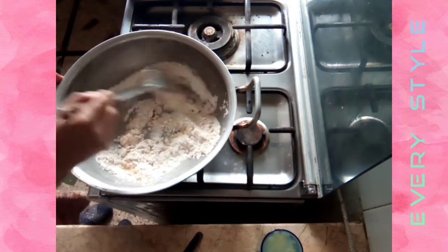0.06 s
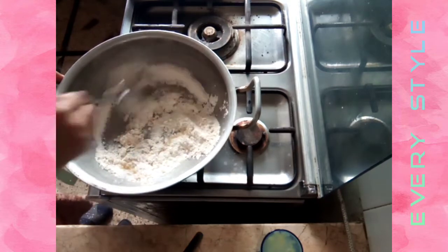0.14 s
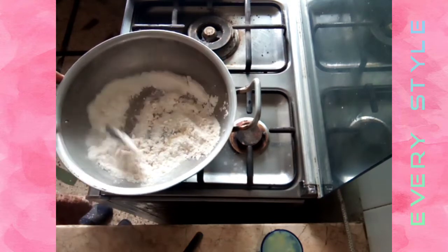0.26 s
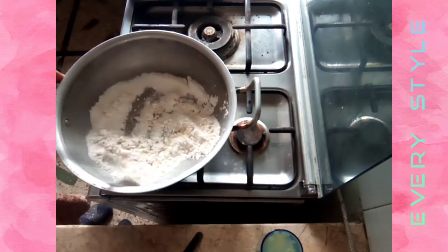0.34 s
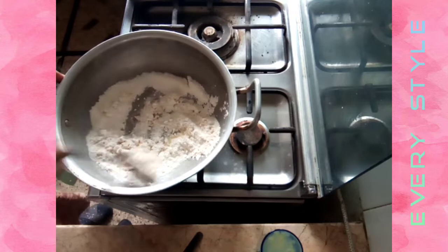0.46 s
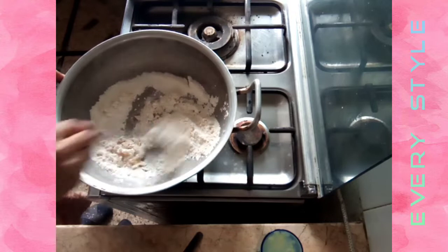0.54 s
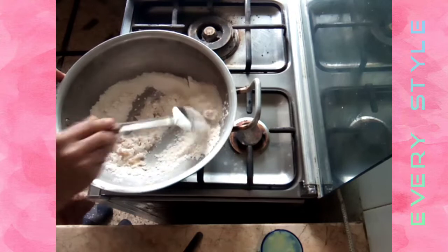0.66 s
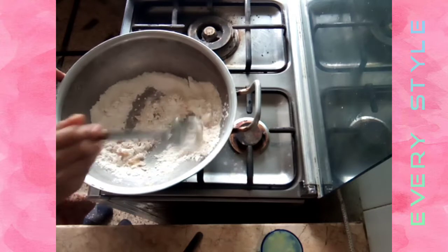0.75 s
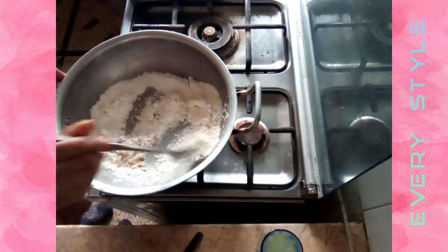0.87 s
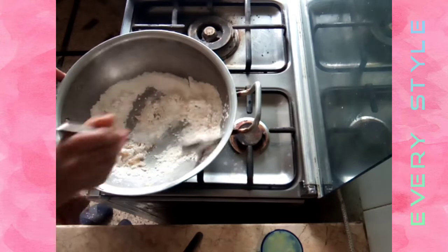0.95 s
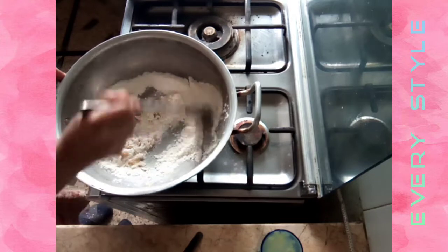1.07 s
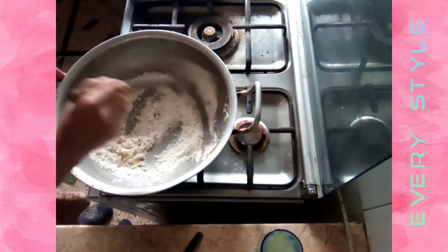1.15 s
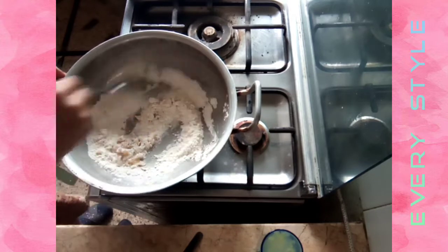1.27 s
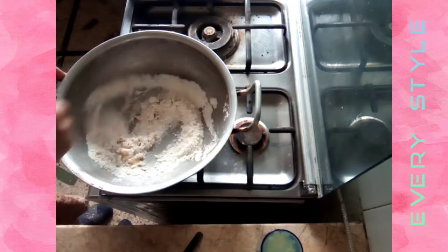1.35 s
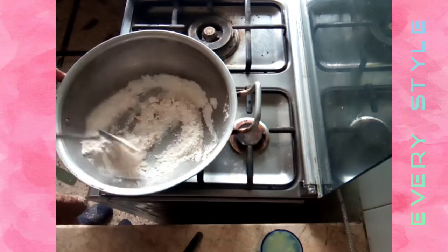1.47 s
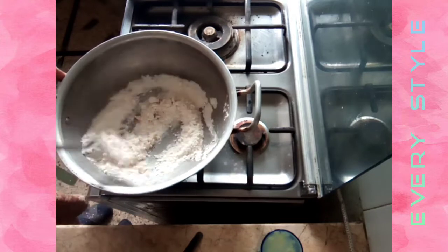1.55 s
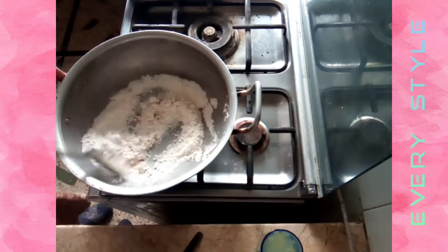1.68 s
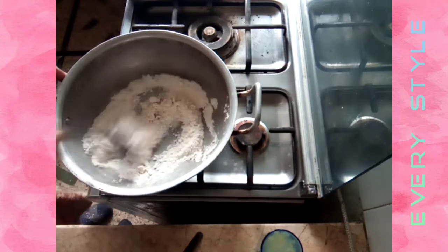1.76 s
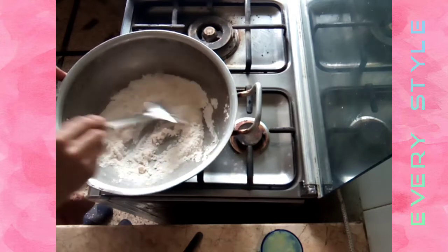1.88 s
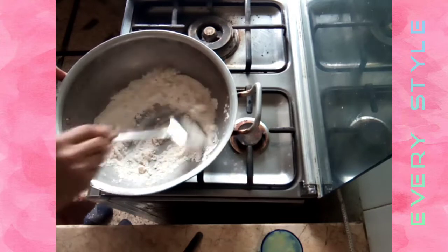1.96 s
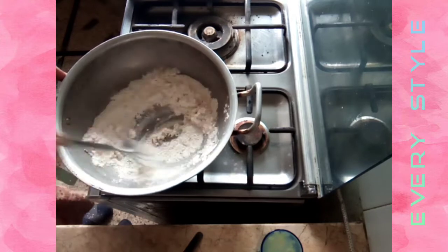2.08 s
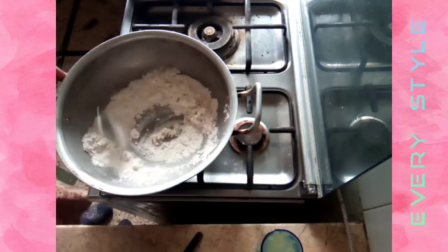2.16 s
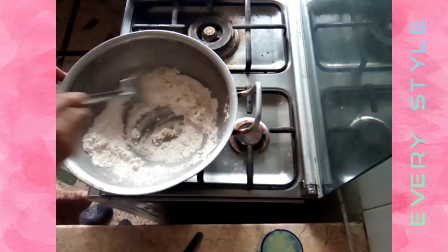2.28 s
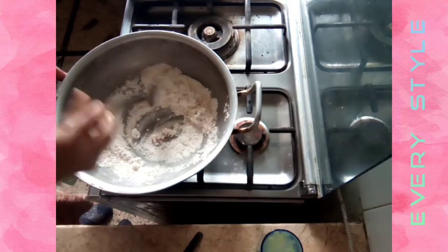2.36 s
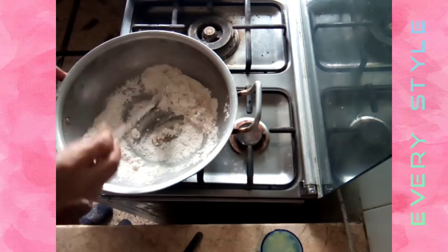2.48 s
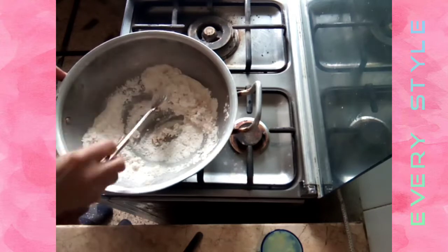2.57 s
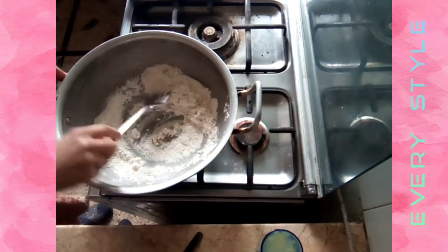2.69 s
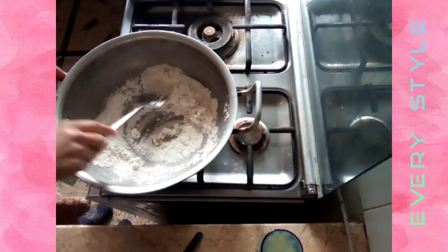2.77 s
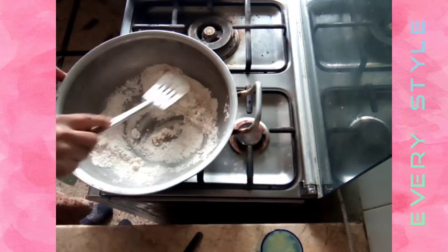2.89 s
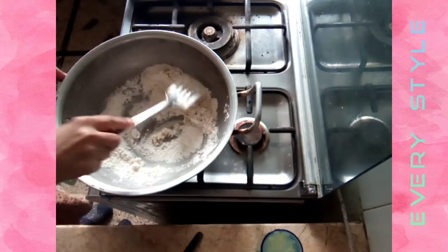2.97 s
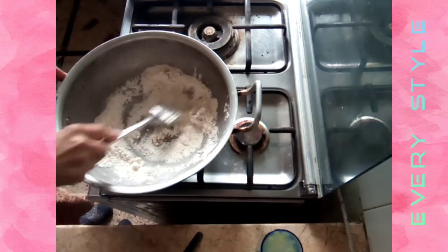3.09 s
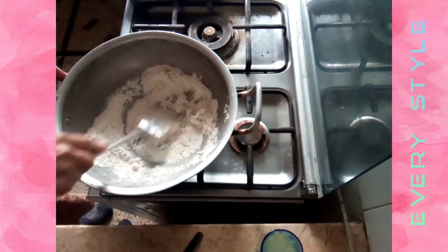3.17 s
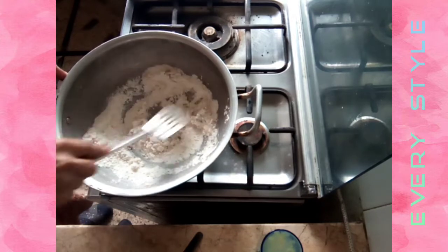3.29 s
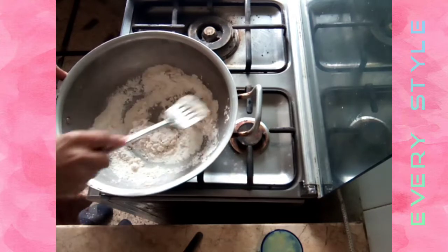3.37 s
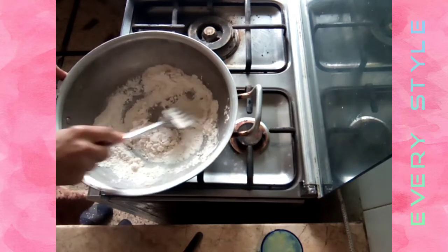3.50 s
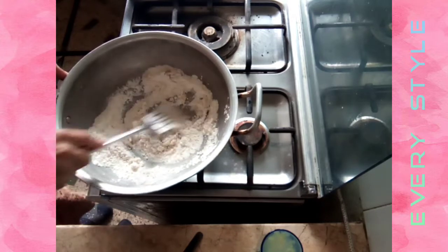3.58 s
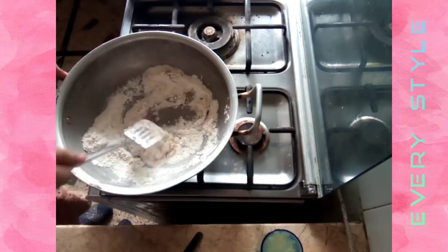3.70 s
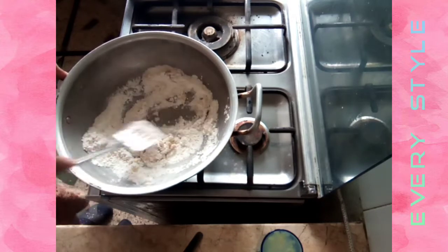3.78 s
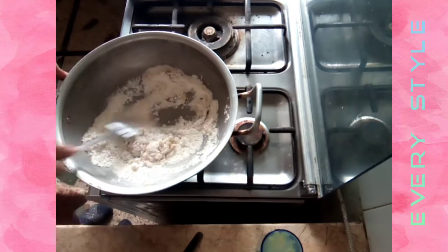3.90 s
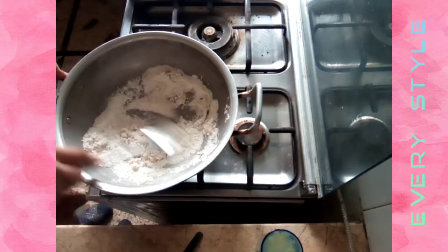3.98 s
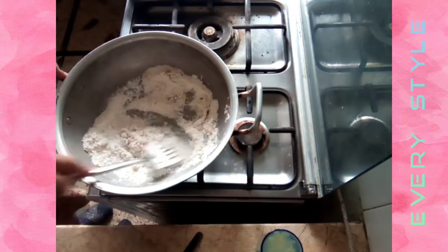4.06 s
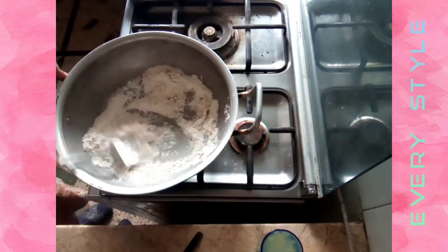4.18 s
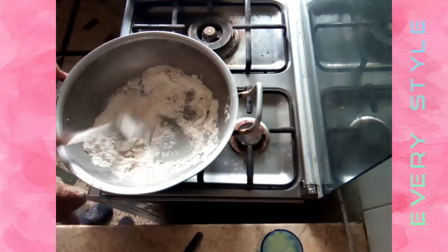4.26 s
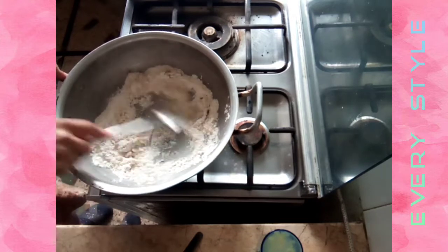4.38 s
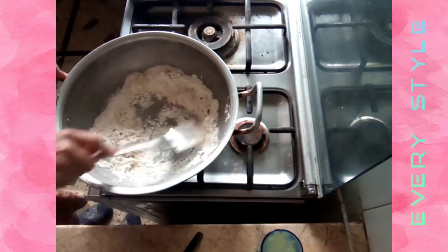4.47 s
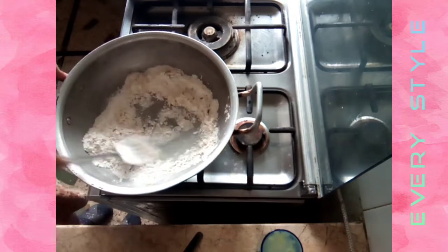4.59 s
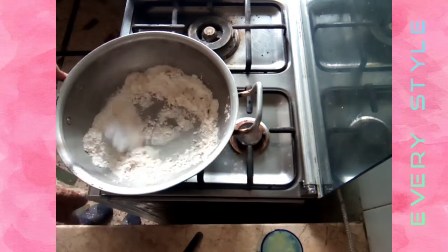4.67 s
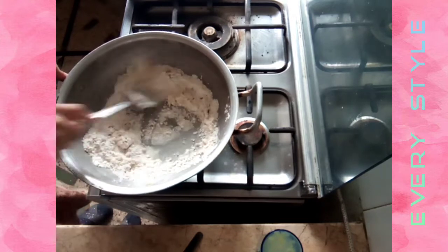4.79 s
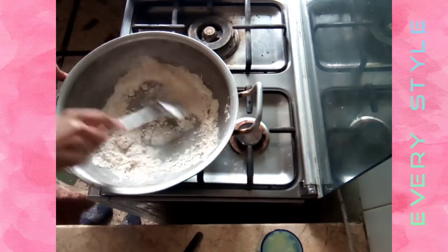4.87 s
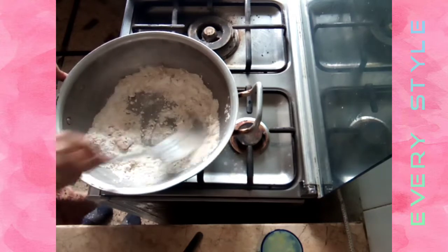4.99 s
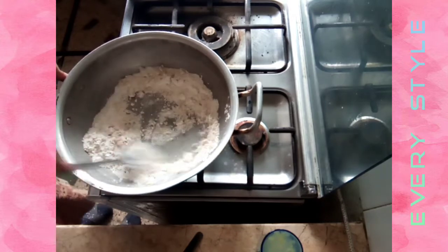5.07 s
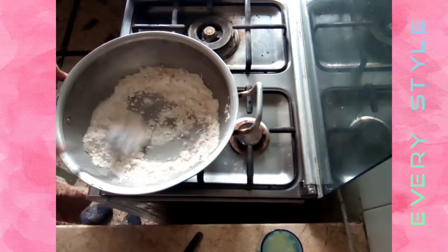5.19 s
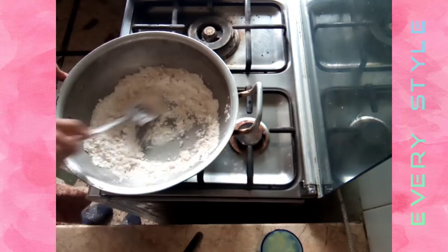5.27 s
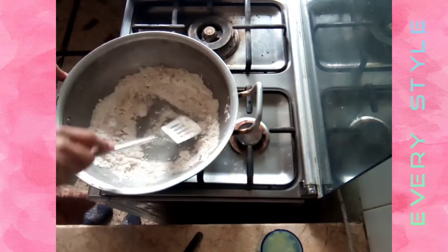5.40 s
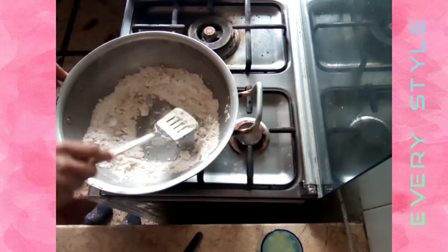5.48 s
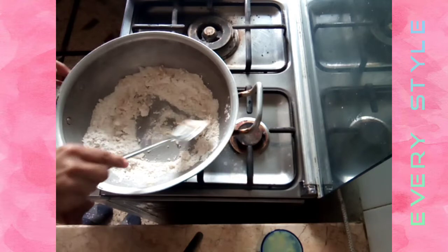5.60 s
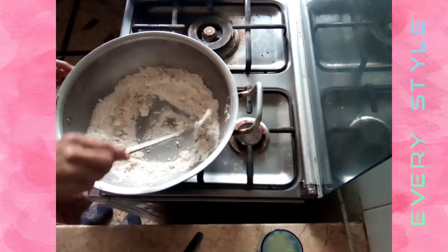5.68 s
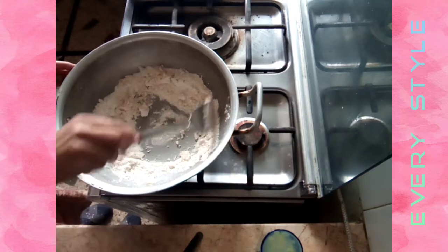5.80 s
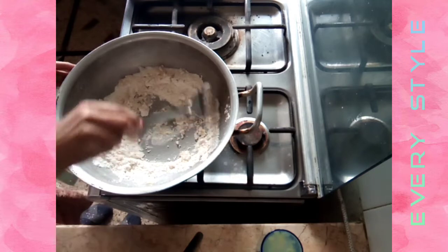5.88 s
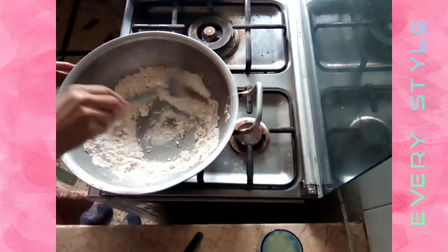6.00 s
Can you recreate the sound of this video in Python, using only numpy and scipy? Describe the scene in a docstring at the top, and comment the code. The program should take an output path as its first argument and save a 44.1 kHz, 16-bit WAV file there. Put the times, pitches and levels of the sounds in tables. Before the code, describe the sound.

A metal spatula scrapes dry flour around a metal pan in repeated rasping strokes, with occasional light taps and dull thuds.

```python
"""A small hard kitchen: a slotted steel spatula stirs dry flour in a wide metal pan on a stove,
heard by a phone just above. Friction of the blade's edge over grit and bare metal is a broadband
force that drives the normal modes of pan and blade. Now and then the blade taps the pan, and heaped
flour thuds dully through pan floor and stove top. The metal sounds reverberate over a faint hiss."""
import sys
import numpy as np
from scipy import signal
from scipy.fft import rfft, irfft, next_fast_len
from scipy.io import wavfile
from scipy.ndimage import uniform_filter1d

SR = 44100
rng = np.random.default_rng(int(sys.argv[2]) if len(sys.argv) > 2 else 0)


def master_out(mix):
    """Clip the mix to full scale and print it as 16-bit PCM to the path in sys.argv[1]."""
    frames = np.transpose(np.atleast_2d(mix))
    ceiling = np.clip(frames, -1, 1)
    pcm = np.round(ceiling * 32767).astype(np.int16)
    wavfile.write(sys.argv[1], SR, pcm)


N = 266628


def undb(db):
    """Amplitude ratio of a level in decibels."""
    return 10 ** (np.asarray(db) / 20)


def level(x, db=0):
    """Normalisation to an rms level."""
    return x * undb(db) / np.sqrt(np.mean(x ** 2))


def colour(x, spectrum):
    """Spectral shaping by (f/Hz, level/dB) points, joined on a logarithmic frequency axis."""
    hz, db = np.transpose(spectrum)
    size = next_fast_len(len(x))
    log_hz = np.log(np.maximum(np.fft.rfftfreq(size, 1 / SR), 1))
    return irfft(rfft(x, size) * undb(np.interp(log_hz, np.log(hz), db)), size)[:len(x)]


def resonate(x, hz, *widths_hz):
    """Resonance with unit gain at its centre; each further bandwidth in cascade steepens the skirts."""
    for width in widths_hz:
        x = signal.lfilter(*signal.iirpeak(hz, hz / width, fs=SR), x)
    return x


def wander(rate_hz):
    """Random modulation: held values, smoothed twice, with a spread near 1."""
    hold = int(SR / rate_hz)
    steps = np.repeat(rng.standard_normal(N // hold + 1), hold)
    return 1.37 * uniform_filter1d(uniform_filter1d(steps, hold), hold)[:N]


def per_sample(rows):
    """Linear interpolation of envelopes from millisecond steps to samples."""
    return np.array([np.interp(np.arange(N) / SR, np.arange(len(row)) / 1000, row) for row in rows])


# Spectrum of the background: f/Hz, relative spectral level/dB
HISS_SPECTRUM = [(35, -51.5), (60, -33), (107, -3), (243, -31), (336, -25), (661, -30), (1030, -36),
                 (1130, -34), (1300, -23.5), (1560, -36.5), (3970, -34), (7990, -34.5), (9300, -26.5),
                 (11500, -30), (13000, -41), (15700, -29.5)]

def hiss():
    """Stationary coloured noise: a faint hiss with a low hump."""
    return level(colour(rng.standard_normal(N), HISS_SPECTRUM), db=-73)


def kitchen(x, t60_s=0.28, onset_s=0.0081, gain_db=-8.5):
    """Reverberation: dense reflections from tiles and steel build up, then decay exponentially."""
    t = np.arange(int(0.6 * SR)) / SR
    dull, bright = rng.standard_normal((2, len(t)))
    dull = signal.lfilter(*signal.butter(1, 5000, fs=SR), dull) * np.exp(-np.log(1000) * t / t60_s)
    bright = bright * np.exp(-np.log(1000) * t / (1.1 * t60_s))
    tail = (dull + 0.47 * bright) * np.minimum(t / onset_s, 1)
    return undb(gain_db) * signal.fftconvolve(x, tail / np.sqrt(np.sum(tail ** 2)))[:N]


# A pan that never lies quite still: level/dB of rumble, boom and drum
SETTLED_DB = [-91.5, -92, -99]
# Flour shoved, pan rocking on the grate: t/s, duration/s, rumble level/dB, boom and drum re rumble/dB
FLOUR_SHOVES = [(0.0, .04, -52, -10.5, -1.5), (0.11, 0.069, -69.5, -9, 13), (0.24, 0.025, -51, -20, -3.5),
                (0.36, 0.041, -59, -11, -7), (0.457, 0.045, -57, -14, 3.5), (0.604, 0.053, -58.5, -7, 6.5),
                (0.796, 0.14, -67, -4, 1), (1.004, 0.073, -60.5, -1, 2), (1.146, 0.054, -67, -2, 5),
                (1.233, 0.12, -65, -22, 5), (1.454, 0.08, -65, -10, 2), (1.58, 0.066, -68, -10, -1.5),
                (1.694, 0.09, -70, 2, 2.5), (1.794, .04, -60, -6, 3), (1.85, .08, -54.5, -13, 2),
                (2.02, 0.14, -66, -13, 1), (2.263, 0.083, -61, -20, 6.5), (2.516, 0.057, -72, -19, -10),
                (2.837, 0.065, -71, -22, -15), (3.073, 0.078, -69, -3.5, 1),
                (3.192, 0.061, -61.5, -1.5, 1.5), (3.696, 0.084, -56.5, -9, -0.5),
                (3.89, 0.027, -67, -1, -7.5), (4.015, 0.084, -78, 3, -5.5), (4.458, .04, -82.5, 0, 7),
                (4.594, 0.031, -87.5, -5, 15.5), (4.803, .04, -82, 2, 7), (4.916, 0.055, -59, -11.5, -2.5),
                (5.42, 0.018, -81.5, -8, 6.5), (5.903, 0.15, -65.5, -19.5, 1.5)]

def shove_gains(rise_db_per_s=299.5, fall_db_per_s=(81.5, 79, 99)):
    """Exponential growth and decay of rumble, boom and drum; overlapping shoves add in power."""
    t = np.arange(0, N / SR + 0.002, 0.001)
    power = undb(np.c_[SETTLED_DB]) ** 2
    for start, duration, db, boom_db, drum_db in FLOUR_SHOVES:
        rise = rise_db_per_s * np.maximum(start - t, 0)
        fall = np.outer(fall_db_per_s, np.maximum(t - start - duration, 0))
        power = power + undb(np.c_[[db, db + boom_db, db + drum_db]] - rise - fall) ** 2
    return undb(per_sample(10 * np.log10(power)))


# Spectrum of shifting flour: f/Hz, relative level/dB
FLOUR_SPECTRUM = [(60, -35), (100, -5), (160, 5), (220, 0), (300, -31.5), (900, -57)]

def flour_heaps(floor_hz=299.7, floor_width_hz=97, stove_hz=65.1, stove_width_hz=17):
    """Forced vibration: rumbling heaps drum the pan floor's lowest mode and boom in the stove top."""
    rumble_gain, boom_gain, drum_gain = shove_gains()
    lumps = undb(2 * wander(30)) * rng.standard_normal(N)
    rumble = colour(lumps, FLOUR_SPECTRUM)
    drum = resonate(lumps, floor_hz, floor_width_hz, 2 * floor_width_hz)
    boom = resonate(rng.standard_normal(N), stove_hz, stove_width_hz, 2 * stove_width_hz)
    return rumble_gain * level(rumble) + drum_gain * level(drum) + boom_gain * level(boom)


# Normal modes of the pan, damped by flour: f/Hz, bandwidth/Hz, relative level/dB
PAN_MODES = [(554, 120, -4), (845, 55, -10), (1520, 100, -10), (2150, 42, -2), (2340, 52, -3),
             (3130, 190, -3), (3440, 99, -3), (4450, 59, -5), (5050, 300, -2), (5360, 34, -4),
             (5920, 180, -2), (6690, 66, 0), (7790, 75, -8), (8720, 85, -3), (9640, 180, -3),
             (10700, 190, -7), (11400, 100, -13), (11800, 62, -12), (12300, 48, -16), (12900, 150, -14),
             (13200, 93, -17), (14200, 69, -11)]

def pan_response(force):
    """Modal superposition: the struck pan answers with the sum of its resonances."""
    return sum(undb(db) * resonate(force, hz, width) for hz, width, db in PAN_MODES)


# Blade on pan: t/s, relative level/dB, clack f/Hz, wall knock weight/dB, contact decay time/s
BLADE_TAPS = [(0.4335, -53.5, 2150, 2, 0.005), (0.4662, -47, 4500, -3.5, 0.0045),
              (0.606, -35, 2130, -20, 0.00094), (0.622, -29, 2250, -29, 0.0029),
              (0.915, -62.5, 2150, 5, 0.0053), (1.0183, -46, 2440, -12, 0.0051),
              (1.5302, -56.5, 2500, 4.5, 0.0037), (1.6688, -53, 2700, -23, 0.0026),
              (1.788, -38.5, 4280, -10, 0.0039), (2.7688, -52.5, 4210, -9.5, 0.0082),
              (3.1953, -42, 2880, -3, 0.0023), (3.67, -35.5, 2970, -25, 0.002),
              (3.8372, -47, 2640, -16, 0.0038), (4.0118, -44, 2400, -40, 0.0018),
              (4.013, -43, 5400, -30, 0.0027), (4.0395, -55, 3000, -20, 0.0025),
              (4.114, -46, 5200, -27, 0.003), (4.3552, -43.5, 2860, -36, 0.0019)]

def blade_taps(wall_hz=1300, ping_decay_s=0.004):
    """Impact excitation: a brief rough contact makes the blade clack, the wall knock and the pan ring."""
    t = np.arange(int(0.046 * SR)) / SR
    force, clacks = np.zeros((2, N + len(t)))
    for start, db, hz, wall_db, contact_s in BLADE_TAPS:
        span = slice(int(start * SR), int(start * SR) + len(t))
        contact = undb(db) * rng.standard_normal(len(t)) * np.exp(-t / contact_s)
        clack = resonate(contact, hz, 700, 1500)
        ping = undb(db - 9.5) * np.sin(2 * np.pi * hz * t) * np.exp(-t / ping_decay_s)
        knock = undb(wall_db + 5) * resonate(contact, wall_hz, 930, 2000)
        force[span] += contact
        clacks[span] += clack + ping + knock
    soft_force = signal.sosfilt(signal.butter(4, [900, 4200], "band", fs=SR, output="sos"), force[:N])
    return undb(11) * clacks[:N] + undb(-1.5) * soft_force + undb(-6) * pan_response(soft_force)


# Spectral regions of a stroke (bowl, wall, rim, low ring, high ring, rasp, edge): f/Hz
REGION_HZ = [530, 950, 1500, 2200, 3300, 5700, 11000]

def drive_db(envelopes, hz):
    """Interpolation in log frequency: the stroke level between the two nearest regions."""
    place = np.interp(np.log(hz), np.log(REGION_HZ), np.arange(len(REGION_HZ)))
    below = min(int(place), len(REGION_HZ) - 2)
    share = place - below
    return (1 - share) * envelopes[below] + share * envelopes[below + 1]


# Fade of each region once the blade lifts: rate/(dB/s)
LIFT_DB_PER_S = [156, 166.5, 165, 169, 167, 178.4, 200]
# Pushes of the blade: t/s, rise/s, hold/s, touch-down level/dB, top level/dB,
# then level/dB re the rasp of bowl drone, wall hum, low ring, high ring and edge sizzle
BLADE_STROKES = [(0.0, 0.12, 0.012, -55.5, -43, 14, 9, -3, -4.5, 5),
                 (0.102, 0.067, 0.024, -45.5, -34.5, -5, 2, -9.5, -1, -0.5),
                 (0.299, 0.039, 0.14, -75, -70, 23.5, 22, 11, 2, -6),
                 (0.462, 0.0028, 0.0079, -51, -49.5, 4, 19.5, -8.5, -5.5, 3),
                 (0.531, .1, 0.02, -56.5, -35.5, 7, 1, 4, 2, 4.5),
                 (0.989, 0.051, 0.039, -61, -43, -2.5, 8.5, -1.5, -2, 5),
                 (1.048, 0.085, 0.056, -44.5, -31.5, -8, 5.5, -25, -8, -0.5),
                 (1.233, 0.083, 0.12, -47, -42.5, -3.5, 2, -11, -3, 2.5),
                 (1.761, 0.069, 0.14, -51.5, -35.5, 1.5, -5.5, -1, -1, 0.5),
                 (1.52, .03, 0.3, -85, -81, 21, 34.5, 13, -2, 5),
                 (1.953, 0.063, 0.047, -57, -45.5, 0, -2, -4.5, -3.5, 3.5),
                 (2.09, 0.039, 0.047, -47, -44, -5, -3, -11, -4.5, 2),
                 (2.19, 0.12, 0.063, -53, -42, 2.5, -20, 1.5, 5.5, 1.5),
                 (2.598, 0.046, 0.067, -68.5, -57.5, 1, -13, 0.5, 0.5, 0),
                 (2.708, 0.062, 0.0083, -66, -52, 3, -2, -13.5, -1, -3.5),
                 (3.03, 0.024, 0.041, -98, -90, 27.5, 38.5, -6, -5, 8),
                 (3.11, 0.055, 0.023, -79, -66, 4, -1, -17, -4, 8),
                 (3.183, .01, .1, -71, -59, -5, 11, 5.5, 0.5, 5.5),
                 (3.587, 0.068, .02, -76.5, -62, -16, -30, -3, -2, 8),
                 (3.665, 0.0032, 0.021, -56, -52.5, -2, 13, 4.5, 0, -1),
                 (3.833, .004, 0.016, -69, -68, 11, 28, 13, 9.5, -23),
                 (4.006, .004, 0.11, -51, -45.5, -10, -1, 7.5, 1, 3.5),
                 (4.127, 0.037, 0.086, -65, -61, -9, -7, 3, 4, 5),
                 (4.322, 0.056, 0.038, -52.5, -40.5, -25, -13, 8, 3.5, 4.5),
                 (4.386, 0.043, 0.045, -49, -39, -16, -12, -5, -1.5, -0.5),
                 (4.522, 0.097, 0.041, -53.5, -40, -11.5, 0, -1, 4.5, 2.5),
                 (4.765, 0.039, 0.024, -48.5, -38, -4.5, -11, 6, 3, 6),
                 (4.813, 0.042, 0.034, -37.5, -34, -16, -8, -19, -2, 2),
                 (4.865, 0.037, 0.026, -60, -51, 6, 19.5, -4.5, -8, -5),
                 (4.945, 0.072, 0.12, -61.5, -40.5, -4, -5, -3, 3, 3),
                 (5.113, 0.025, 0.01, -55, -46, -16, -3, 6.5, 8.5, 5),
                 (5.252, 0.021, 0.023, -52, -39, -9.5, -23, 4, 0, 5),
                 (5.291, 0.054, 0.013, -46.5, -35.5, -10, -10.5, 6.5, 3, 5.5),
                 (5.858, 0.021, 0.12, -73.5, -60, 13.5, 14.5, -16, -4, 5.5),
                 (5.948, 0.096, .02, -59, -46.5, 6, 0, -14, -2.5, 3)]

def stroke_envelopes(rise_bend=1.31, sag_db_per_s=42.5):
    """Incoherent sum of pushes, in dB per region: each swells, sags while held and fades on lifting."""
    t = np.arange(0, N / SR + 0.002, 0.001)
    power = 1e-14
    for start, rise, hold, touch_db, top_db, bowl, wall, low_ring, high_ring, edge in BLADE_STROKES:
        age = t - start
        swell = (touch_db - top_db) * np.clip(1 - age / rise, 0, 1) ** rise_bend
        sag = sag_db_per_s * np.clip(age - rise, 0, hold)
        lift = np.outer(LIFT_DB_PER_S, np.maximum(age - rise - hold, 0))
        rim = 2.5 + 0.61 * low_ring + 0.39 * wall  # the rim follows its neighbours
        tint = np.c_[[bowl, wall, rim, low_ring, high_ring, 0, edge]]
        power = power + (age >= 0) * undb(top_db + swell - sag - lift + tint) ** 2
    return per_sample(10 * np.log10(power))


def friction(scatter_db, judder_db):
    """Dry friction: dense tiny catches of uneven size, bunched by the judder of the edge."""
    size = undb(scatter_db * rng.exponential(size=N) + judder_db * wander(120))
    return level(size * rng.standard_normal(N))


# Spectrum of the grating between the modes: f/Hz, relative level/dB
GRIT_SPECTRUM = [(240, -45.5), (400, -5), (552, -1.5), (670, -15), (800, -13.5), (1330, -5), (2100, -2.5),
                 (3760, -1.5), (5040, 3), (8240, -4.5), (9750, -4.5), (13500, -16), (15700, -6.5)]

def grating(envelopes):
    """Broadband friction noise: each third-octave band follows the strokes and flickers on its own."""
    noise = colour(friction(scatter_db=2, judder_db=3), GRIT_SPECTRUM)
    sound = 0
    for hz in 420 * 2 ** np.arange(0, 5.4, 1 / 3):
        band = signal.butter(3, [hz * 2 ** (-1 / 6), hz * 2 ** (1 / 6)], "band", fs=SR, output="sos")
        sound += signal.sosfilt(band, noise) * undb(drive_db(envelopes, hz) + 1.6 * wander(18))
    return sound


def wall_modes(count):
    """Constant modal density of a thin wall: weak high modes as (f/Hz, bandwidth/Hz, level/dB)."""
    offset, weakness = rng.random((count, 2)).T
    hz = 3600 + 11300 * (np.arange(count) + offset) / count
    grit_hz, grit_db = np.transpose(GRIT_SPECTRUM)
    db = np.interp(np.log(hz), np.log(grit_hz), grit_db) - 9 - 6 * weakness
    return list(zip(hz, 30 + 0.0044 * hz, db))


# Normal modes of the blade: f/Hz, bandwidth/Hz, relative level/dB
BLADE_MODES = [(558.6, 5.9, -3), (994, 71, -14), (2230, 9.2, -11.5), (2670, 92, -6.5), (2992, 51, -2),
               (3500, 12, -4.5), (4180, 23, 1.5), (4343, 29, -5), (4890, 11, 1.5), (6966, 140, -0.5)]

def scraped_metal(envelopes):
    """Forced resonance: friction drives the modes, each waxing and waning as the contact point moves."""
    force = friction(scatter_db=2.5, judder_db=2.5)
    sound = 0
    for hz, width, db in PAN_MODES + BLADE_MODES + wall_modes(count=36):
        gain = undb(db + drive_db(envelopes, hz) + 3.35 * wander(12))
        polarity = rng.choice([-1, 1])
        sound += resonate(force * gain * polarity, hz, width, 8 * width)  # deep valleys between modes
    return sound


def scene():
    """Superposition of scraping and taps, their reverberation, the flour and the hiss."""
    envelopes = stroke_envelopes()
    scrape = undb(8.5) * scraped_metal(envelopes) + undb(1.5) * grating(envelopes)
    pan = scrape + blade_taps()
    return (hiss() + kitchen(pan) + flour_heaps() + pan)[None]


def record(dry, port_hz=15200, port_width_hz=520, cutoff_hz=15720):
    """Resonance of the microphone port lifts the extreme treble; the phone's steep low-pass follows."""
    heard = dry + undb(6.5) * resonate(dry, port_hz, port_width_hz)
    return signal.sosfilt(signal.ellip(12, 0.3, 60, cutoff_hz, fs=SR, output="sos"), heard)


dry = scene()
out = record(dry)
master_out(out)
```